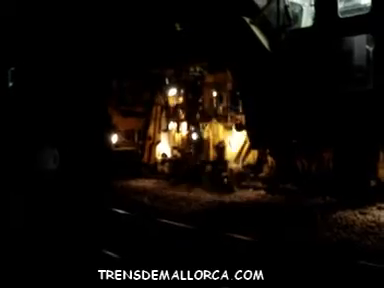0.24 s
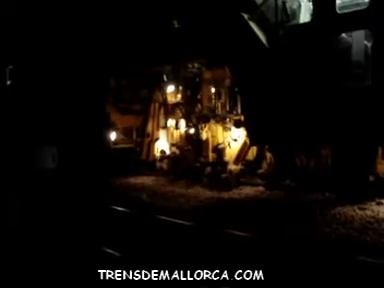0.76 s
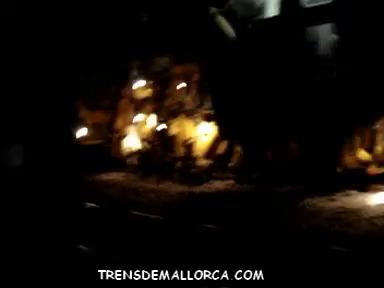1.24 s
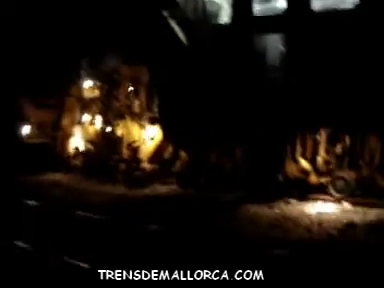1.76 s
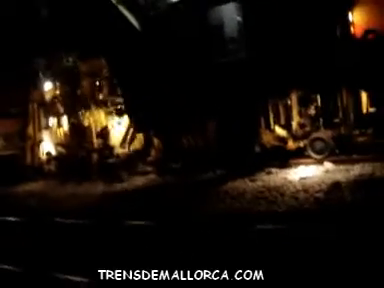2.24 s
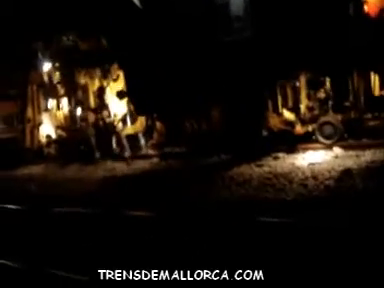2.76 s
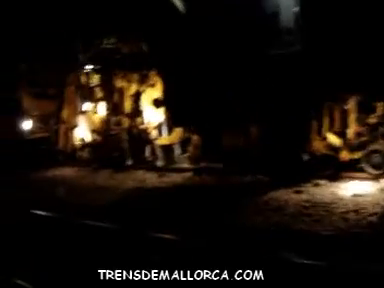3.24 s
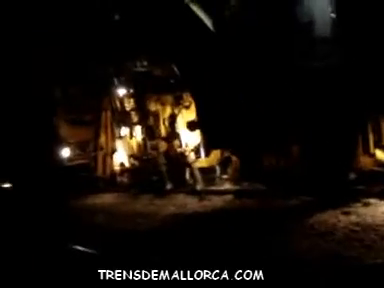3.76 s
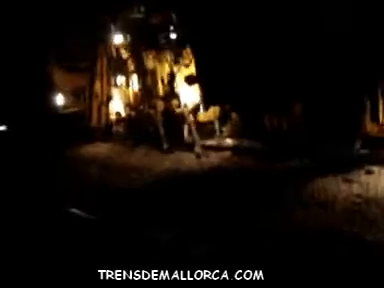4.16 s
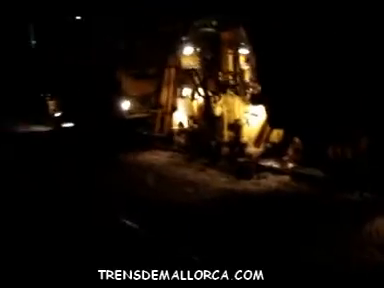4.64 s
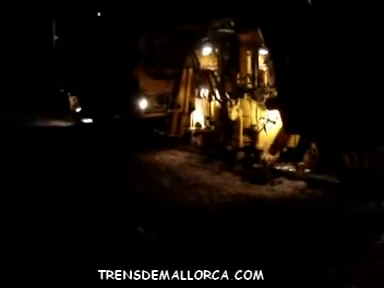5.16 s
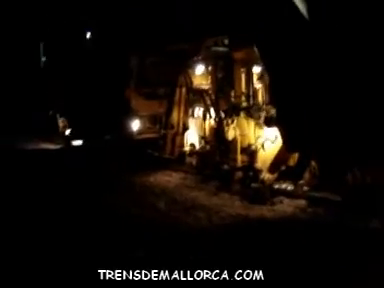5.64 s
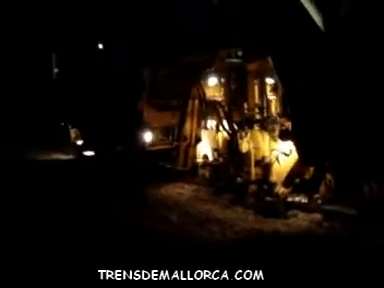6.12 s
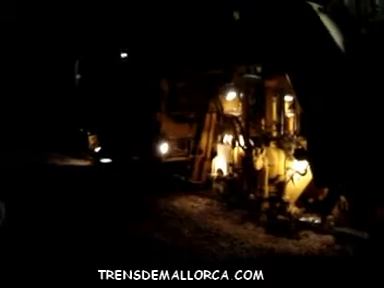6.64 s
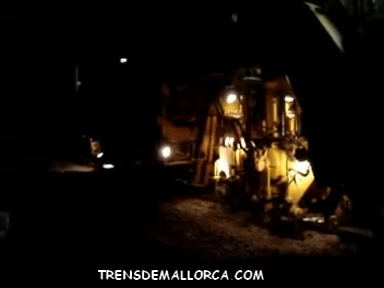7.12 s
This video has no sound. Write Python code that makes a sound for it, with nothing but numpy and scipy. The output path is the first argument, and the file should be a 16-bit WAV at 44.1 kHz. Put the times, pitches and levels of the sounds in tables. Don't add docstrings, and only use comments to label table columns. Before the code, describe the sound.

A railway maintenance machine packs ballast outdoors at night, heard from nearby. A steady low diesel drone, broad rushing roar and fast steel clatter run throughout. At about 0.1 to 0.4 s gravel crunches in a tight burst as the vibrating tines bite; smaller stone knocks follow up to about 1 s. The shaking slows under load and the engine sags slightly, with hydraulic whine coming and going. Around 2.3 to 2.5 s stones scrape as the tines lift. From roughly 3 to 4.2 s the raised unit sings with a thin, hollow whine. The engine runs up a little, then at 4.5 s a second crunch lands and the roar dips briefly before surging back. The tines thump and grind on, panels resonating more strongly, with faint crunches near 5.5 and 6.9 s. The engine lifts slightly towards the end, still running at 7.4 s. The sound is nearly mono, hollow and shifting, with patchy treble.

```python
import sys
import numpy as np
from scipy import signal
from scipy.fft import rfft, irfft, next_fast_len
from scipy.io import wavfile
from scipy.ndimage import uniform_filter1d, map_coordinates

SR = 44100
rng = np.random.default_rng(int(sys.argv[2]) if len(sys.argv) > 2 else 0)


def boost_factor(decibels):
    exponent = np.asarray(decibels, float) / 20
    return 10 ** exponent


def dump_mix(stems):
    frames = np.atleast_2d(stems).T
    limited = np.clip(frames, -1, 1)
    pcm = np.round(limited * 32767).astype(np.int16)
    wavfile.write(sys.argv[1], SR, pcm)


N = 325437

# (frequency [Hz], density [dB per Hz])
RUMBLE_SPECTRUM = [(13, -58), (22, -51), (54, -25), (103, -9), (128, -5), (156, -4.5), (217, -5.5),
                   (264, 1.5), (500, -11.5), (650, -40), (1100, -120)]
ROAR_SPECTRUM = [(210, -35), (350, -0.5), (382, -3), (678, -3), (1020, -3.5), (1130, -3), (1320, -6),
                 (2250, -12), (2800, -9), (3640, -38), (6160, -120)]
CLATTER_SPECTRUM = [(1180, -12.5), (2000, -2.5), (2230, -6), (3020, -1.5), (3210, -4), (3750, -8),
                    (4030, -8), (4370, -10.5), (5660, -11.5), (7720, -16), (9350, -16), (11200, -27),
                    (11700, -55), (15200, -63), (22000, -120)]
GRAVEL_SPECTRUM = [(150, -60), (500, -12), (1200, -6), (2800, 0), (4500, -4), (7000, -9), (9500, -14),
                   (11200, -26), (11900, -46), (13000, -120)]
# (time [s], first comb peak [Hz], reflected share [0-1])
MIRROR = [(0, 640, 0.47), (.5, 720, 0.3), (1.2, 770, .45), (1.6, 830, 0.5), (2, 861, 0.66), (2.5, 940, 0.6),
          (3, 1000, 0.3), (3.6, 1080, .38), (4.05, 880, 0.28), (4.35, 661, 0.45), (4.9, 620.3, 0.47),
          (5.4, 780, 0.38), (6.2, 790, 0.4), (6.7, 823, 0.4), (7.38, 704, 0.16)]
# (frequency [Hz], width [Hz], level [dB])
PANELS = [(582, 10, 2), (680, 16, 0), (1125, 45, 2), (1470, 40, -8), (1900, 60, -8), (4000, 1100, -16)]
# (start [s], end [s], level [dB])
PANELS_DRIVEN = [
    (.6, 1.6, -33.5),
    (3, 4.1, -36),
    (4.85, 5.85, -27),
    (5.8, 6.5, -30.5),
    (6.45, 7.6, -24.5),
]
# (start [s], end [s], level [dB])
GAP_SINGS = [
    (.2, .8, -26.5),
    (.8, 1.7, -28),
    (1.7, 2.75, -31),
    (4.22, 4.5, -28),
    (4.74, 5.05, -27.5),
]
# (start [s], end [s], level [dB])
NOISE_DIP = (4.56, 4.77, -2.5)
# (time [s], level [dB])
EXHAUST = [(0.0, -32), (0.29, -28.5), (0.59, -30.5), (1.11, -27.5), (1.15, -29.5), (1.87, -25.5),
           (3.84, -25), (4.62, -29), (4.73, -34), (4.79, -28.5), (6.33, -26), (7.05, -30), (7.34, -26.5),
           (7.38, -28)]
UNEVEN_ORDERS = [(2 / 3, -54), (5 / 3, -52), (2.69, -40.5), (4, -47), (5, -45)]
# (start [s], end [s], level [dB])
THIRD_DIP = (4.58, 6.88, -10.5)
# (start [s], end [s])
UNLOADED = [
    (-1, .14),
    (4.06, 4.62),
    (6.8, 8),
]
# (time [s], rate [Hz])
SHAKE = [(0, 34.97), (.28, 35.02), (.75, 33.84), (1.1, 33.28), (1.6, 32.63), (2, 32.41), (2.25, 32.47),
         (2.75, 33.16), (3.3, 33.85), (3.75, 34.06), (4.25, 34.23), (4.55, 34.5), (4.75, 34.39),
         (5.05, 33.8), (6.25, 32.49), (6.75, 32.18), (7.05, 32.23), (7.38, 32.5)]
# (multiple of piston rate [-], level [dB])
STEADY_PISTONS = [(2, -42.5), (5, -44.5), (9, -38), (10, -43)]
# (start [s], end [s], multiple of piston rate [-], level [dB])
WHINES = [(.65, 1.3, 2, -29), (2.6, 3.3, 2, -40), (5.1, 5.9, 2, -36), (6.2, 6.7, 2, -37),
          (.85, 1.3, 5, -37), (2.45, 2.7, 5, -43), (2.72, 3.08, 5, -31.5), (6.6, 7.4, 5, -44),
          (1.5, 2.5, 6, -43), (6.3, 7.3, 6, -43), (3.6, 4.4, 7, -41), (2.95, 4.2, 8, -38),
          (5.25, 5.6, 8, -38), (2.45, 2.65, 9, -35), (2.9, 4.1, 9, -42), (5.76, 6.1, 9, -29.5),
          (6.3, 6.6, 9, -44), (0, .35, 10, -44), (2.78, 3.05, 10, -38), (4.1, 4.45, 10, -40),
          (5.3, 5.65, 10, -41), (5.95, 6.25, 10, -37.5), (3.25, 3.8, 12, -39), (4.05, 4.3, 12, -41),
          (3.9, 4.4, 14, -46), (7, 7.4, 15, -45)]
# (start [s], end [s], level [dB])
STRAIN = [
    (1.5, 2.35, -1),
    (3.5, 4.2, -3),
    (6.4, 7.2, -6),
]
# (multiple of piston rate [-], level [dB])
STRAINED_PISTONS = [(11, -43), (12, -48), (16, -50), (17, -43), (18, -46), (20, -52), (21, -52)]
# (tines bite [s], tines lift [s])
PLUNGES = [
    (.35, 2.34),
    (4.55, 7.6),
]
# (multiple of shake rate [-], level re grip [dB])
THUMP = [(1, -40), (2, -1.5), (3, -8), (4, -5.5), (5, -2.5), (6, 2.5), (7, 2.5), (8, 0), (9, 1)]
# (peak time [s], level [dB], rise [s], t60 [s], tilt [dB per octave])
CRUNCHES = [(.13, -26, .05, .6, -1), (.2, -16.5, .02, .35, -2), (.245, -17, .025, 1.2, -.5),
            (.3, -21, .02, .9, -.5), (.37, -23, .015, 1.6, 0), (4.51, -19.5, .05, 1.4, .5),
            (4.535, -23, .02, .6, 0), (4.65, -23, .03, .25, .5), (2.49, -22, .015, .35, 0),
            (.5, -25, .01, .3, -2), (.58, -22, .01, .2, -3), (.74, -23, .02, .3, -2),
            (1.05, -28, .04, .5, 1), (2.34, -27, .04, .6, 0), (3.48, -31, .02, .4, 1),
            (4.24, -29, .03, .5, -1), (4.86, -27, .03, .5, -1), (5.5, -29, .03, .5, 0),
            (6.93, -27, .03, .9, -1)]

USUAL_FIRING_HZ, UNLOADED_FIRING_HZ, USUAL_SHAKE_HZ = 108, 111.2, 33.4
DROOP_HZ_PER_HZ = .95
# (usual level [dB], slope [dB per Hz of shake], slope [dB per Hz of firing])
RUMBLE_LAW, ROAR_LAW, CLATTER_LAW = (-28.5, 1.2, 0.63), (-19.6, 0.5, 0.079), (-23.5, 0.096, 0.25)
BITE_ROAR_DB, BITE_ROAR_S, BITE_WAIT_S = 1, .35, .2
AIR_DULLS_DB = -0.8
HOUSING_HZ, HOUSING_WIDTH_HZ, HOUSING_DB = 1953, 170, -32
PANEL_REST_DB, GAP_REST_DB = -40, -43.5
USUAL_EXHAUST_DB, SECOND_DB, SECOND_DB_PER_DB = -27, -30.5, 0.69
THIRD_DB, THIRD_DB_PER_HZ = -31.5, 1.5
FREE_DB, BITE_DB, HOLD_DB = -57.5, -36.5, -43.5
BITE_S, SETTLE_S, LIFT_S = 0.37, 0.21, 0.38
SONG_DB, SONG_WAIT_S, SONG_RISE_S, SONG_FALL_S = -34, 0.39, 0.77, 0.34


def unit(x):
    return x / np.sqrt(np.mean(x ** 2) + 1e-20)


def curves(rows):
    time_s, *columns = np.transpose(rows)
    return [np.interp(np.arange(N) / SR, time_s, column) for column in columns]


def wobble(rate_hz):
    knots = rng.standard_normal(int(N * rate_hz / SR) + 4)
    return map_coordinates(knots, [np.arange(N) * rate_hz / SR])


def spell(start_s, end_s, rise_s, fall_s):
    t = np.arange(N) / SR
    ramp = np.minimum((t - start_s) / rise_s, (end_s - t) / fall_s)
    return np.clip(ramp + .5, 0, 1) ** 2


def spells(rows, rest_db, edge_s):
    return boost_factor(rest_db) + sum(boost_factor(db) * spell(t0, t1, edge_s, edge_s) for t0, t1, db in rows)


def filtered(x, response):
    m = next_fast_len(len(x) + 8192)
    gain = response(np.fft.rfftfreq(m, 1 / SR) + 1)
    return irfft(rfft(x, m) * gain, m)[:len(x)]


def colour(points):
    f, db = np.transpose(points)
    return lambda hz: boost_factor(np.interp(np.log(hz), np.log(f), db))


def rush(spectrum, patchy_db):
    z = signal.stft(rng.standard_normal(N), nperseg=512)[2]
    patches = uniform_filter1d(rng.standard_normal(z.shape), 4, 0)
    patches = unit(uniform_filter1d(patches, 24, 1))
    noise = signal.istft(z * boost_factor(patchy_db * patches), nperseg=512)[1][:N]
    return unit(filtered(noise, colour(spectrum)))


def tone(angle, db, flutter_db, blur_rad):
    gain = np.sqrt(2) * boost_factor(db + flutter_db * wobble(7))
    return gain * np.sin(angle + blur_rad * wobble(12) + rng.uniform(0, 2 * np.pi))


def firing_hz():
    loaded = USUAL_FIRING_HZ + DROOP_HZ_PER_HZ * (curves(SHAKE)[0] - USUAL_SHAKE_HZ)
    let_go = sum(spell(t0, t1, .3, .15) for t0, t1 in UNLOADED)
    return loaded + (UNLOADED_FIRING_HZ - loaded) * let_go


def law(usual_db, per_shake_db, per_firing_db):
    shake_db = per_shake_db * (curves(SHAKE)[0] - USUAL_SHAKE_HZ)
    return usual_db + shake_db + per_firing_db * (firing_hz() - USUAL_FIRING_HZ)


def raised():
    start_s = PLUNGES[0][1] + SONG_WAIT_S + SONG_RISE_S / 2
    return spell(start_s, PLUNGES[1][0] - SONG_FALL_S / 2, SONG_RISE_S, SONG_FALL_S)


def mirrored(x):
    peak_hz, share = curves(MIRROR)
    share = np.clip(share, 0, .95)
    lows = filtered(x, lambda hz: 1 / (1 + (hz / 1250) ** 4))
    late = map_coordinates(lows, [np.arange(N) - SR / peak_hz], order=1, mode="nearest")
    return (x + share * late) / np.sqrt(1 + share ** 2)


def machine(shake):
    surge_db = .4 * wobble(11) + .6 * wobble(25)
    beat = np.cos(shake + .8 * wobble(4.9))
    drive_starts_s = [bite_s + BITE_WAIT_S for bite_s, _ in PLUNGES]
    biting_db = BITE_ROAR_DB * sum(spell(s, s + BITE_ROAR_S, .1, .25) for s in drive_starts_s)
    rumble_db = law(*RUMBLE_LAW) - 4 + surge_db
    roar_db = law(*ROAR_LAW) + biting_db - 0.78 + 1.36 * surge_db + 0.61 * beat
    clatter_db = law(*CLATTER_LAW) + AIR_DULLS_DB * raised() + surge_db + .5 * beat
    rumble = boost_factor(rumble_db) * mirrored(rush(RUMBLE_SPECTRUM, patchy_db=0.5))
    roar = boost_factor(roar_db) * mirrored(rush(ROAR_SPECTRUM, patchy_db=0.33))
    clatter = boost_factor(clatter_db) * rush(CLATTER_SPECTRUM, patchy_db=1.18)
    dip = boost_factor(NOISE_DIP[2] * spell(*NOISE_DIP[:2], .08, .04))
    return dip * (rumble + roar + clatter)


def panels():
    def ring(hz):
        return np.sqrt(sum(boost_factor(2 * db) / (1 + (2 * (hz - c) / w) ** 2) ** 2 for c, w, db in PANELS))
    return spells(PANELS_DRIVEN, PANEL_REST_DB, 0.41) * unit(filtered(rng.standard_normal(N), ring))


def gap():
    slide = 2 * np.pi * np.cumsum(curves(MIRROR)[0] + 40 * wobble(6)) / SR
    a, b = (filtered(rng.standard_normal(N), lambda hz: 1 / (1 + (hz / 95) ** 2)) for _ in range(2))
    band = unit(a * np.cos(slide) + b * np.sin(slide))
    return spells(GAP_SINGS, GAP_REST_DB, 0.17) * boost_factor(1.9 * wobble(8)) * band


def housing():
    def ring(hz):
        return 1 / (1 + (2 * (hz - HOUSING_HZ) / HOUSING_WIDTH_HZ) ** 2)
    return boost_factor(HOUSING_DB) * np.sqrt(raised()) * unit(filtered(rng.standard_normal(N), ring))


def diesel(firing):
    first_db = curves(EXHAUST)[0]
    second_db = SECOND_DB + SECOND_DB_PER_DB * (first_db - USUAL_EXHAUST_DB)
    third_db = law(THIRD_DB, THIRD_DB_PER_HZ, 0)
    third_db = third_db + THIRD_DIP[2] * spell(*THIRD_DIP[:2], .15, 0.57)
    out = np.zeros(N)
    for k, db in enumerate((first_db, second_db, third_db)):
        out += tone((k + 1) * firing, db, flutter_db=0.74 + 0.81 * k, blur_rad=0.08 * k)
    for order, db in UNEVEN_ORDERS:
        out += tone(order * firing, db, flutter_db=4.5, blur_rad=0.71)
    return out


def motor(shake):
    piston, out = 10 * shake, np.zeros(N)
    for k in range(2, 23):
        swells = [(t0, t1, db) for t0, t1, order, db in WHINES if order == k]
        for t0, t1, db in STRAIN:
            swells += [(t0, t1, db + shine_db) for order, shine_db in STRAINED_PISTONS if order == k]
        rest_db = dict(STEADY_PISTONS).get(k, -47 - .6 * k)
        out += spells(swells, rest_db, .15) * tone(k * piston, 0, flutter_db=1.8, blur_rad=.45)
    return out


def tines(shake):
    t = np.arange(N) / SR
    grip = boost_factor(FREE_DB)
    for bite_s, lift_s in PLUNGES:
        settling = np.exp(-np.maximum(t - bite_s - BITE_S, 0) / SETTLE_S)
        grip_db = HOLD_DB + (BITE_DB - HOLD_DB) * settling
        grip = grip + spell(bite_s, lift_s, BITE_S, LIFT_S) * boost_factor(grip_db)
    thump = grip * sum(tone(k * shake, db, flutter_db=2.5, blur_rad=0.079 * k) for k, db in THUMP)
    song = raised() * tone(4.12 * shake, SONG_DB, flutter_db=1.0, blur_rad=.15)
    return thump + song


def gravel():
    out, t = np.zeros(N + SR), np.arange(SR) / SR
    for peak_s, db, rise_s, t60_s, tilt_db in CRUNCHES:
        def response(hz):
            tilt = boost_factor(tilt_db * np.log2(hz / 3000))
            return colour(GRAVEL_SPECTRUM)(hz) * tilt / (1 + (300 / hz) ** 6)
        grain_db = 3.2 * rng.standard_normal(SR // 20).repeat(20)
        spray = unit(filtered(rng.standard_normal(SR) * boost_factor(grain_db), response))
        shape = np.clip(t / rise_s, 0, 1) ** 2 * boost_factor(-60 * np.maximum(t - rise_s, 0) / t60_s)
        out[round((peak_s - rise_s) * SR):][:SR] += boost_factor(db) * shape * spray
    return out[:N]


def scene():
    firing = 2 * np.pi * np.cumsum(firing_hz()) / SR
    shake = 2 * np.pi * np.cumsum(curves(SHAKE)[0]) / SR
    background = machine(shake) + panels() + gap() + housing()
    mono = background + diesel(firing) + motor(shake) + tines(shake) + gravel()
    return np.array([mono, mono])


def patchy_treble(x):
    hz, t, z = signal.stft(x, SR, nperseg=512)
    f = hz[:, None]

    def luck(count):
        return rng.random((count, len(t) // 4 + 1)).repeat(4, axis=1)[:, :len(t)]

    open_top, notch = luck(2)
    top_gain = boost_factor(3 + 21 * np.clip((f - 11250) / 500, 0, 1))
    top = np.where(open_top < .24, top_gain, boost_factor(-90))
    z = z * np.where(f > 11150, top, 1)
    z = z * np.where((f > 10400) & (notch < .08), boost_factor(-60), 1)
    edges_hz = np.array([4100, 4700, 5600, 6200, 6900, 7600, 8400, 9000, 9700, 10400, 11200, 11900])
    chance = luck(len(edges_hz) + 1)[np.searchsorted(edges_hz, hz)]
    stray = np.where(chance < .009, 1, np.where(chance < .028, boost_factor(-16), 0))
    stray = stray * (f > edges_hz[0]) * np.where(f > edges_hz[-2], .8, 1)
    side = stray * np.abs(z) * np.exp(2j * np.pi * rng.random(z.shape))
    return signal.istft(np.array([z + side, z - side]), SR, nperseg=512)[1][:, :N]


def top_cut(x):
    return signal.sosfilt(signal.butter(12, 11820, fs=SR, output="sos"), x)


def record(dry):
    clipped = dry[0] / (1 + np.abs(dry[0] / 1.8) ** 4) ** (1 / 4)
    mix = patchy_treble(clipped)
    return top_cut(mix)


dry = scene()
out = record(dry)
dump_mix(out)
```